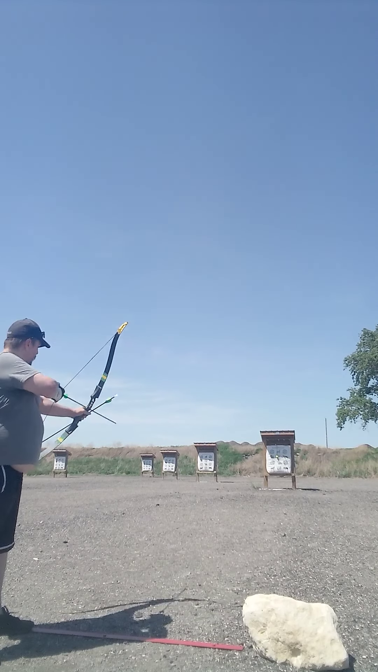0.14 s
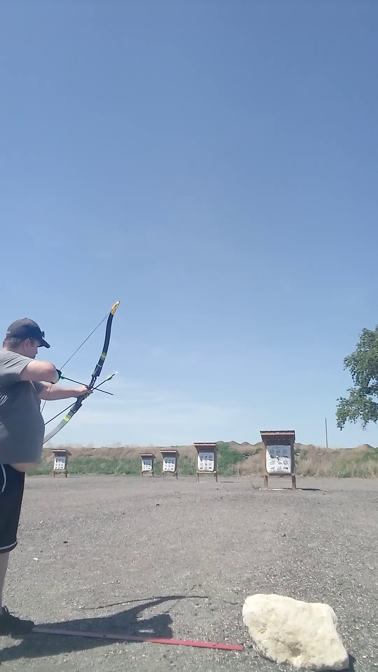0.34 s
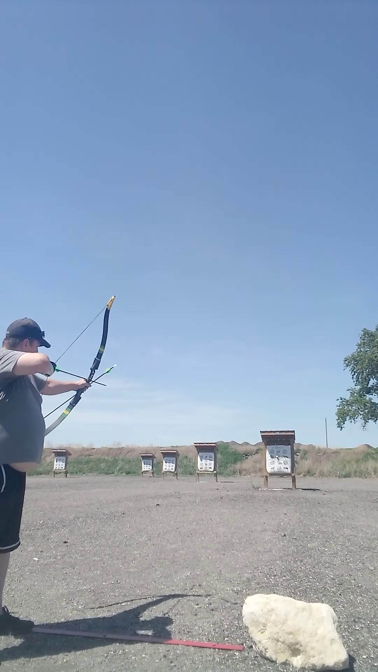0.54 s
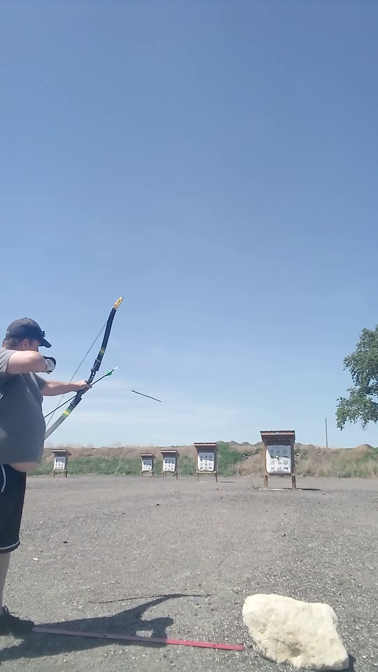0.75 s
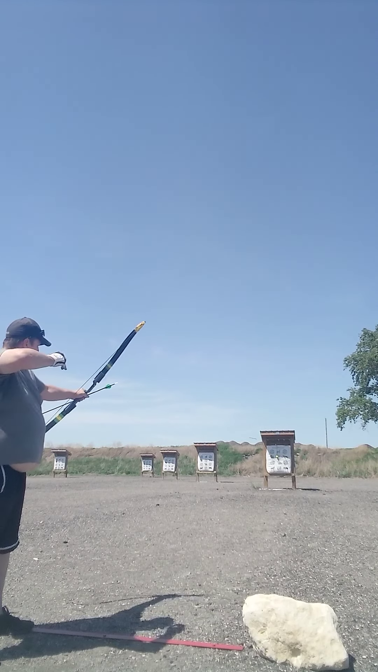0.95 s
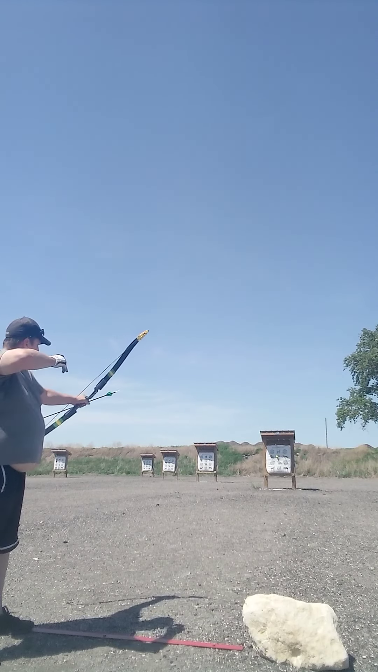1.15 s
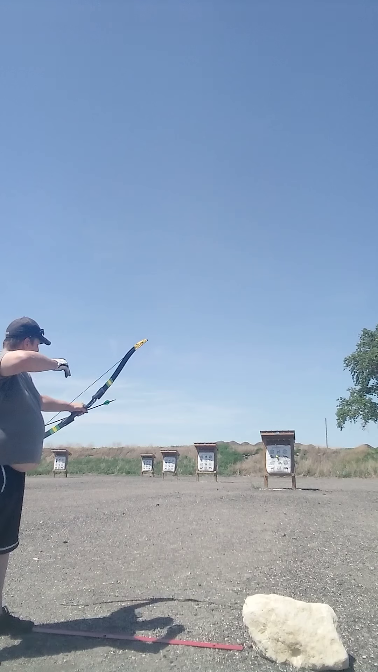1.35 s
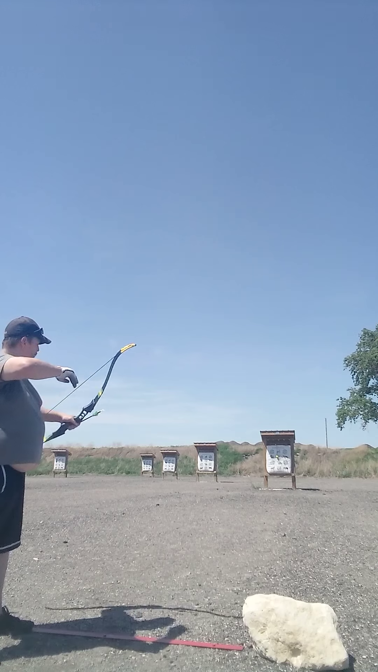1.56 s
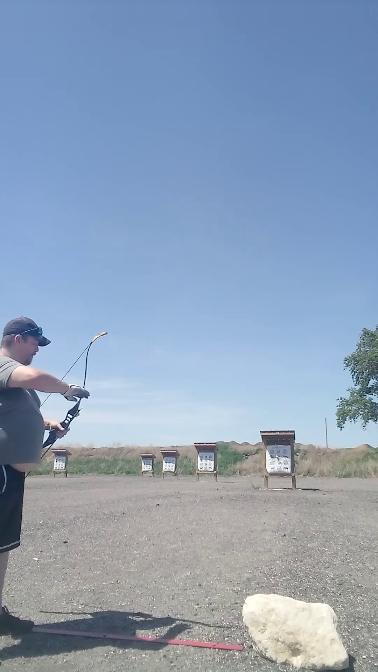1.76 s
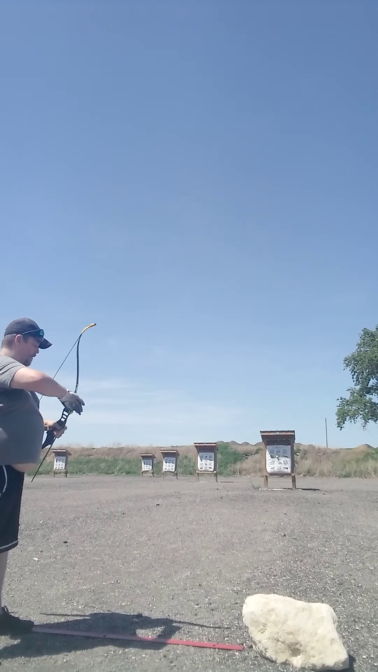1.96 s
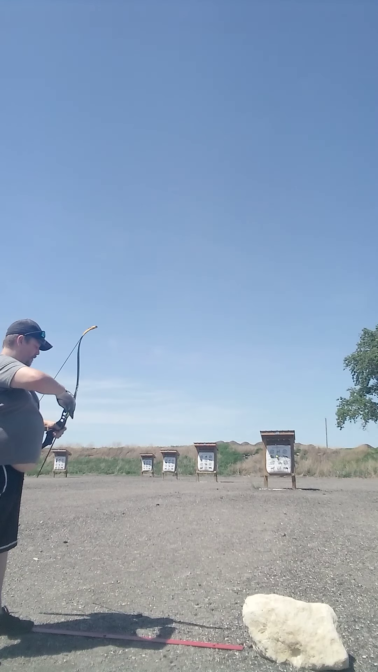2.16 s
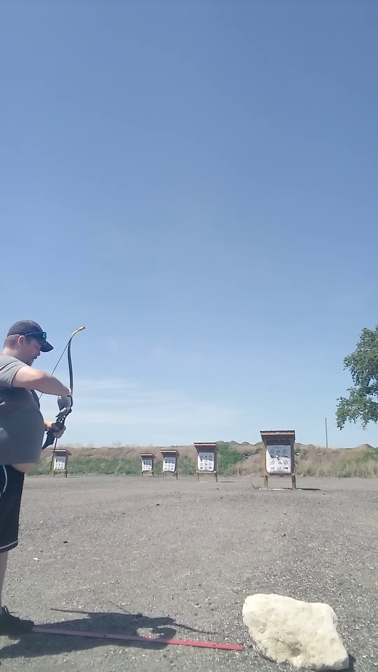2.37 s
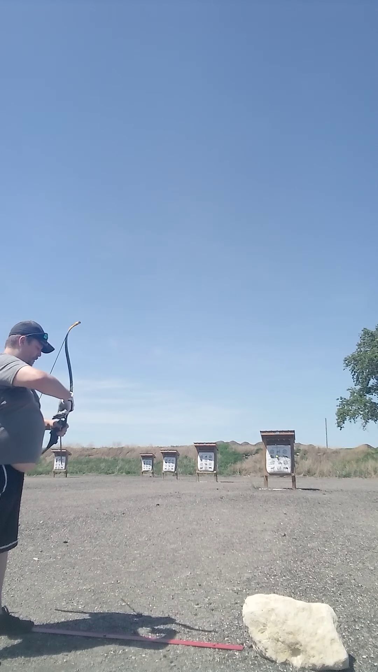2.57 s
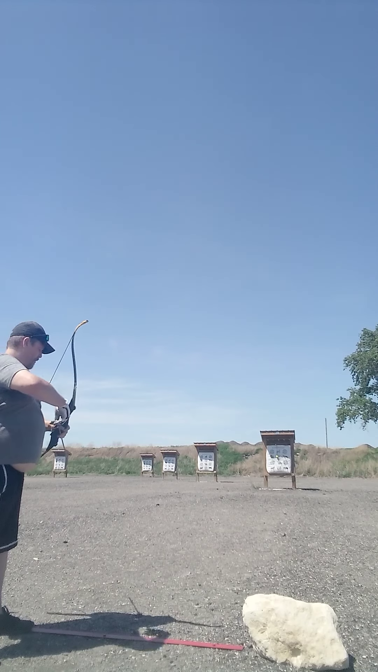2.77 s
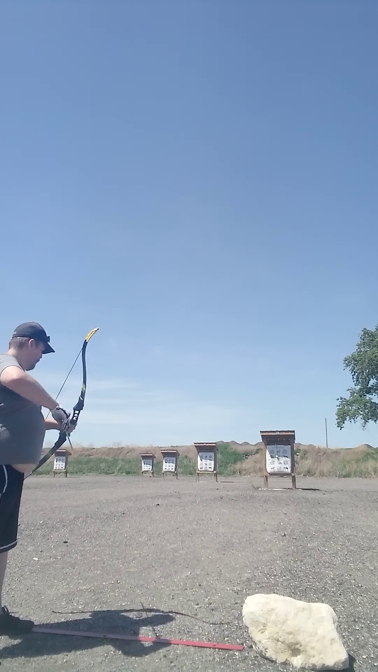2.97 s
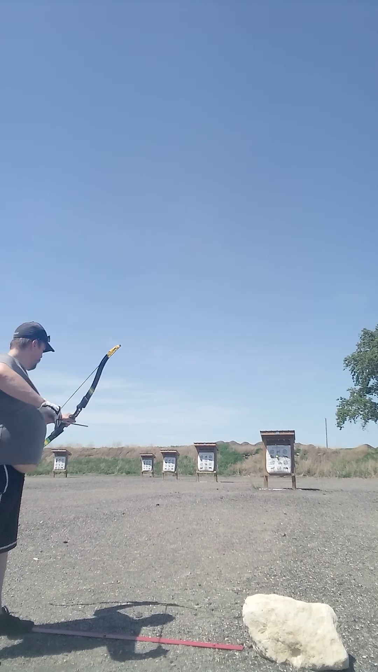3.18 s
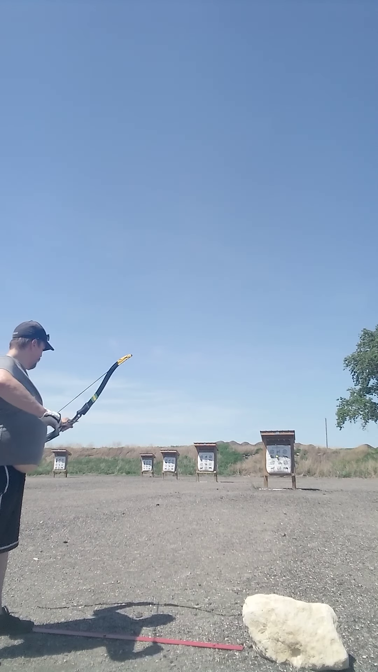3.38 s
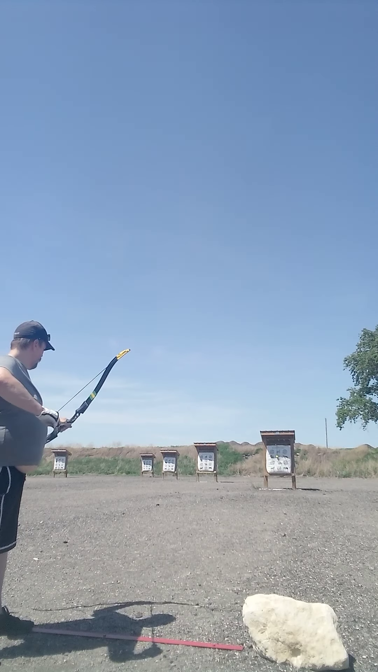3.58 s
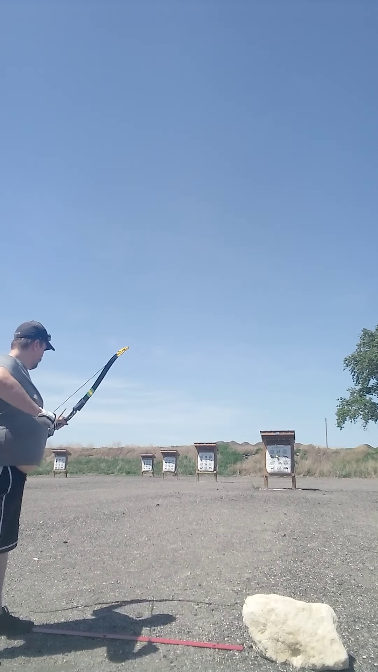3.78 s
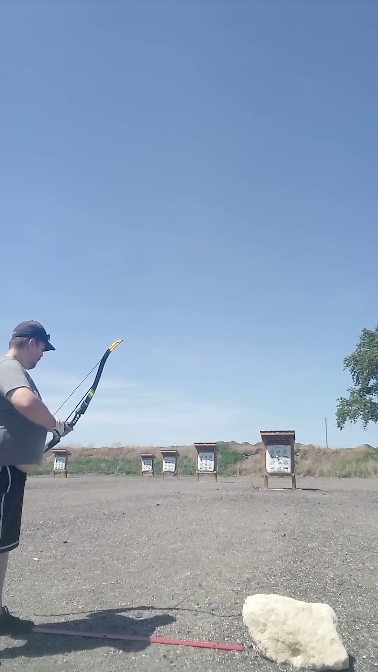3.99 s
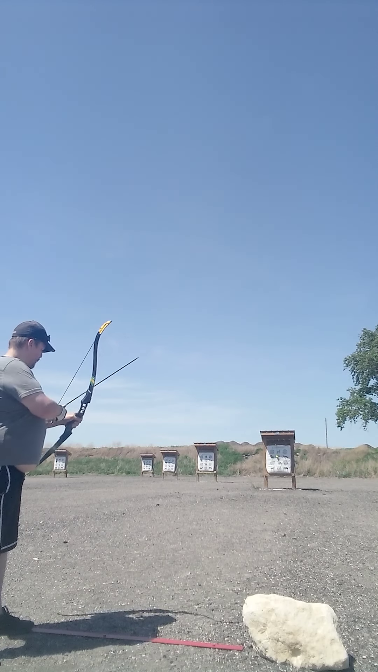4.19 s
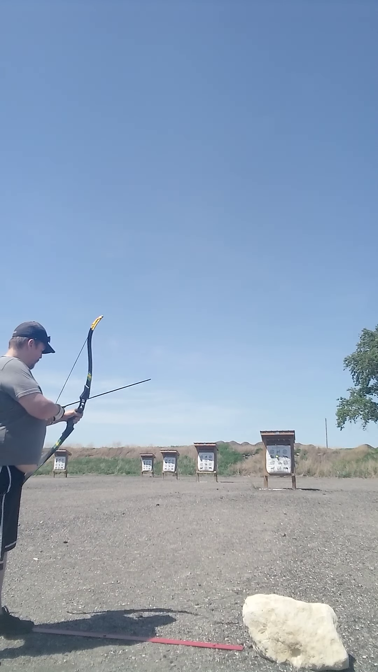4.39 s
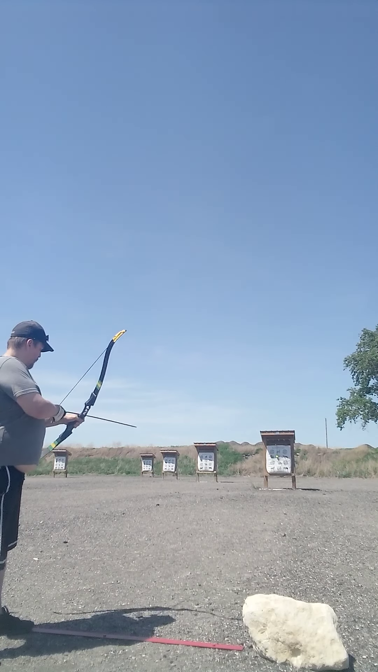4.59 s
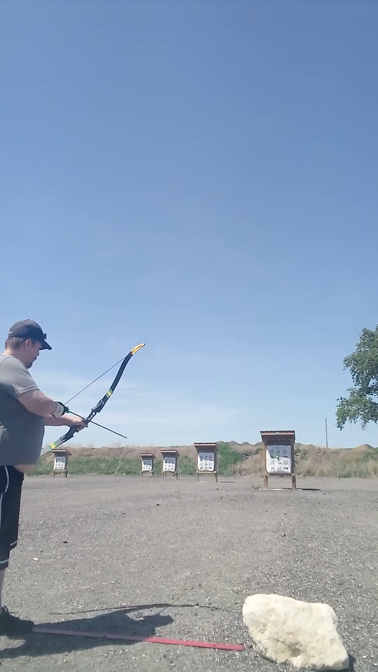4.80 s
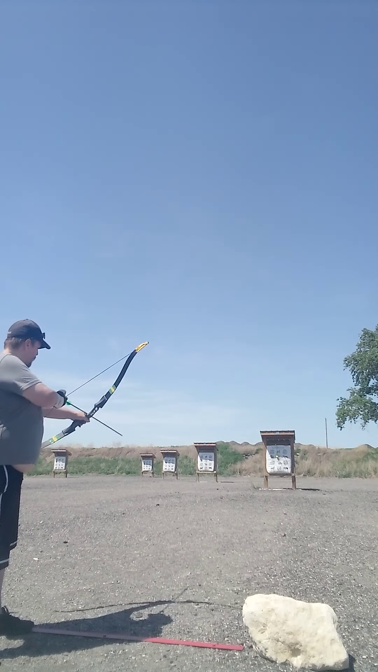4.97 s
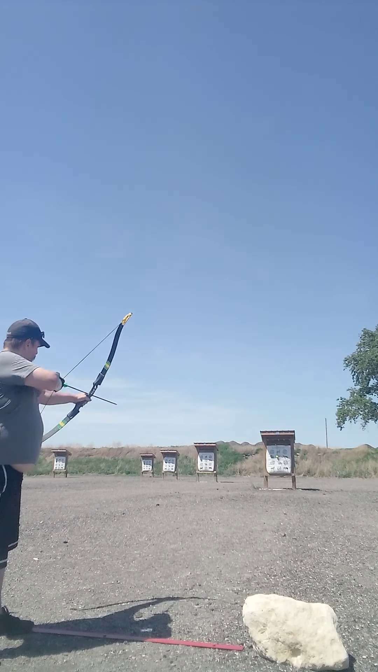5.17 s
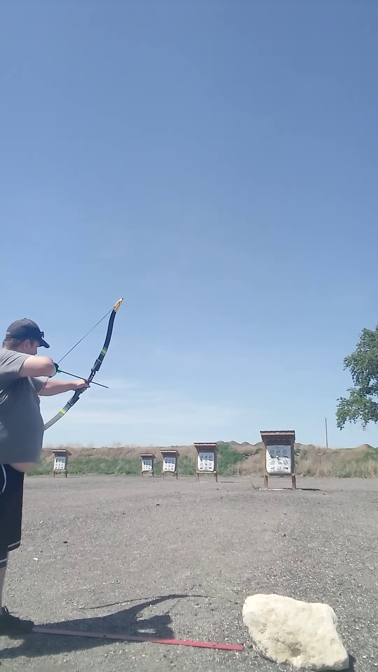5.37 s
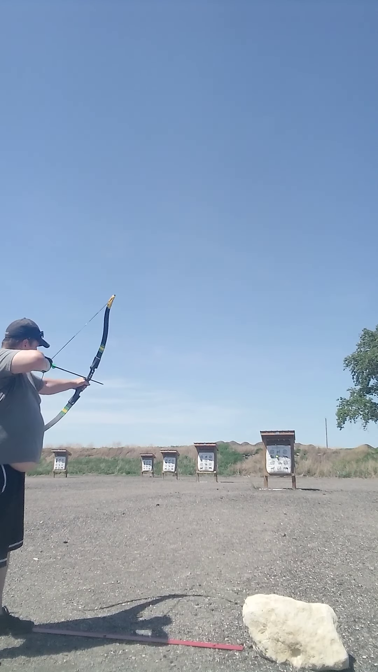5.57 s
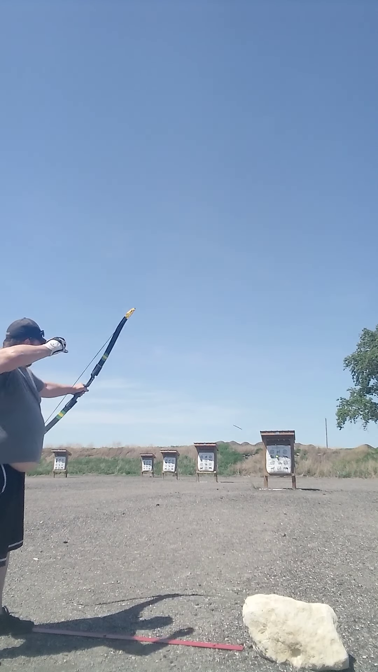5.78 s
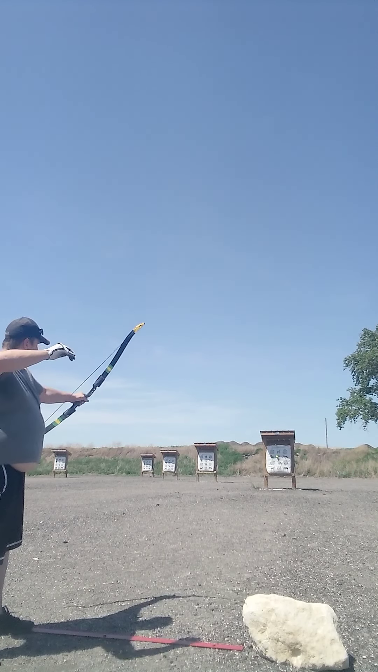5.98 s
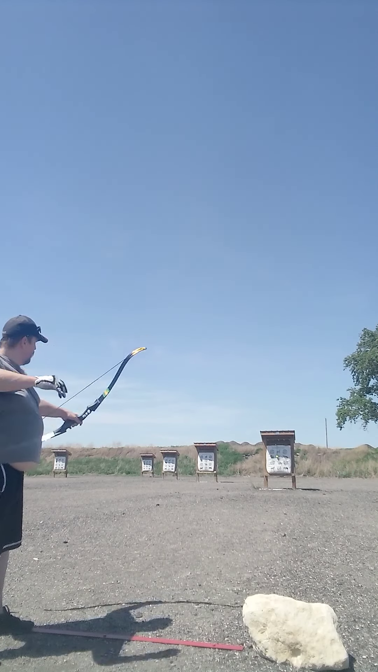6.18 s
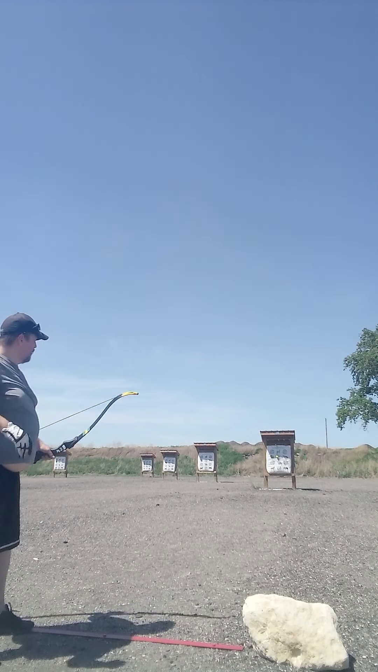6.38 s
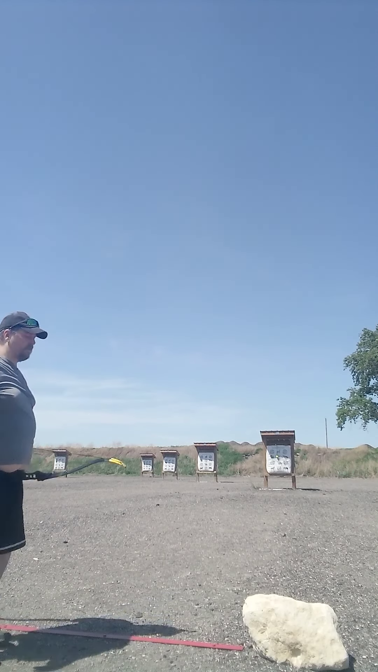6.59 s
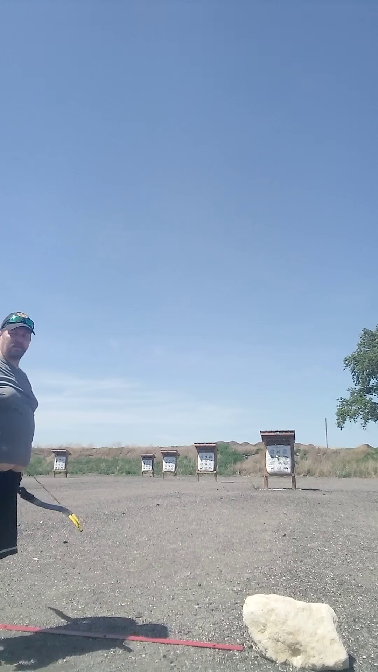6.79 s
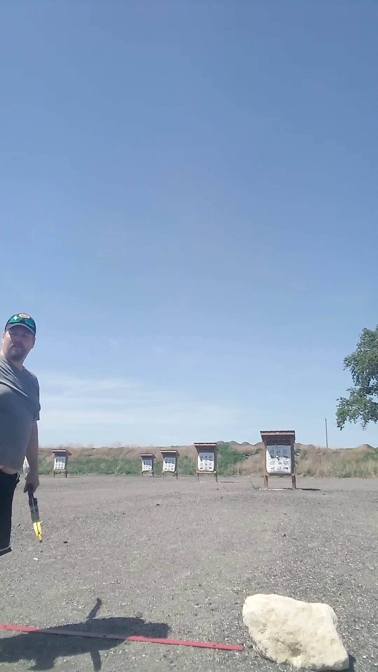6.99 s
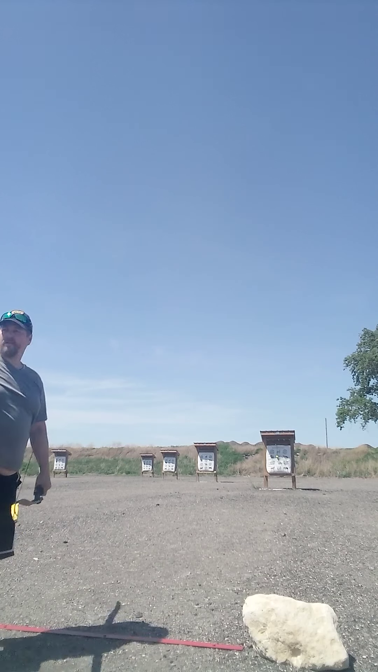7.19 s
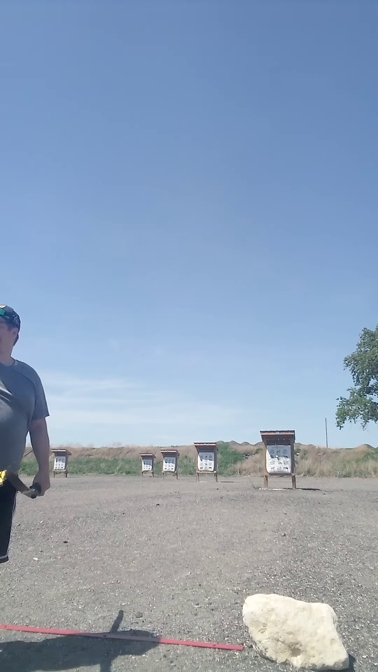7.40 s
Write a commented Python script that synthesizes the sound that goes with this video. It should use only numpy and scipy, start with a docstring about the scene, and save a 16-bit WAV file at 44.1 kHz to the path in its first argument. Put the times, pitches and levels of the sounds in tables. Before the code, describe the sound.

Wind rumbles and flutters on the microphone throughout, strongest in the first half second, over a faint drone of distant traffic and a soft hiss of leaves. At about 0.85 seconds a recurve bow is shot a few metres away: the arrow rattles across the rest and the string slaps, leaving a brief low hum. Around 3.4 seconds the next arrow is nocked with a few hard, bright clicks. From 4.6 to 5.4 seconds it ticks lightly against the rest with a small ring. A small bird chips faintly several times between 4.4 and 6.4 seconds. The second shot snaps and twangs at about 5.75 seconds. A hand knocks sharply on the bow at 6.25 seconds, and shoes grind quietly on gravel from 6.7 to 7 seconds. The wind swells again at the end. The open space gives very little echo.

```python
"""A gravel archery range: an archer shoots two arrows from a recurve bow, a few metres from a phone.
At each release the arrow rattles on the rest and two string slaps set string and limbs humming.
Between shots an arrow clicks and ticks as it is nocked; later a hand knocks the bow and shoes turn.
Wind buffets the microphone; a far road drones, leaves hiss and a small bird chips."""
import sys
import numpy as np
from scipy import signal
from scipy.fft import rfft, irfft, next_fast_len
from scipy.io import wavfile
from scipy.ndimage import uniform_filter1d

SR = 44100
rng = np.random.default_rng(int(sys.argv[2]) if len(sys.argv) > 2 else 0)


def digitize_waveform(pressure):
    """Quantize a signal to 16-bit integers and store it at the path in sys.argv[1].

    Rows of a 2-D input are taken as channels; values are limited to [-1, 1].
    """
    field = np.atleast_2d(pressure).T
    bounded = np.clip(field, -1, 1)
    quanta = np.round(bounded * 32767).astype(np.int16)
    wavfile.write(sys.argv[1], SR, quanta)


N = 328382
T = np.arange(N) / SR
AGE = T[:SR // 2]  # seconds since a blow

# Wind strength. Each row: time in seconds, level in dB.
WIND_LEVEL = [(0.0, -48.5), (0.54, -53), (0.74, -53.5), (1.1, -59.5), (2.67, -55.5), (2.92, -59.5),
              (3.17, -62), (3.54, -63.5), (3.69, -75), (3.92, -69), (4.13, -60), (4.4, -59.5),
              (5.16, -58.5), (5.41, -68), (5.99, -52.5), (6.8, -65), (7.15, -63.5), (7.45, -52)]


def undb(db):
    """Decibels to gain."""
    return 10 ** (np.asarray(db) / 20)


def unit(x):
    """Scale to rms 1."""
    return x / np.sqrt(np.mean(x ** 2) + 1e-30)


def add(out, start_s, x):
    """Mix x into out from start_s on."""
    i = max(int(start_s * SR), 0)
    out[i:i + len(x)] += x[:max(N - i, 0)]


def colour(x, tone, tilt_db_oct=0):
    """Minimum-phase filter of unit power through tilted (Hz, dB) points."""
    size = next_fast_len(len(x)) * 2
    octave = np.log2(np.maximum(np.fft.rfftfreq(size, 1 / SR), 1))
    hz, db = np.transpose(tone)
    gain = unit(undb(np.interp(octave, np.log2(hz), db + tilt_db_oct * np.log2(hz))))
    cepstrum = irfft(np.log(gain))
    cepstrum[1:size // 2] *= 2
    cepstrum[size // 2 + 1:] = 0
    return irfft(rfft(x, size) * np.exp(rfft(cepstrum)))[:len(x)]


def cut(x, order, hz, kind="low"):
    """Butterworth low-pass or high-pass."""
    return signal.sosfilt(signal.butter(order, hz, kind, fs=SR, output="sos"), x)


def resonate(x, modes):
    """Parallel resonances (Hz, width Hz, dB) of unit total power."""
    ring = sum(undb(db) * width_hz * np.exp(-np.pi * width_hz * AGE) * np.cos(2 * np.pi * hz * AGE)
               for hz, width_hz, db in modes)
    ring = cut(ring, 2, 1500, "high")  # small parts radiate no bass
    return signal.fftconvolve(x, ring / np.linalg.norm(ring))[:len(x)]


def fade(t60_s):
    """Envelope that falls 60 dB in t60_s."""
    return np.exp(-np.log(1000) * AGE / t60_s)


def burst(decay_ms, rise_ms=0.071):
    """Rough contact: fast-decaying noise."""
    age_ms = AGE * 1000
    return rng.standard_normal(len(AGE)) * np.exp(-age_ms / decay_ms) * (1 - np.exp(-age_ms / rise_ms))


def walk(rate_hz):
    """Smooth random drift, spread near 1."""
    hop = int(SR / rate_hz)
    knots = rng.standard_normal(N // hop + 2)
    return np.sqrt(2) * uniform_filter1d(np.interp(np.arange(N) / hop, np.arange(len(knots)), knots), hop)


def curve(points, times_s=T):
    """Straight lines through (s, value) points."""
    return np.interp(times_s, *np.transpose(points))


def noise(tone, patchy_db=0, size=1024):
    """Coloured noise of rms 1; narrow bands flicker separately by patchy_db."""
    bands = signal.stft(colour(rng.standard_normal(N), tone), nperseg=size)[2]
    flicker = uniform_filter1d(rng.standard_normal(bands.shape), size=3, axis=0)
    flicker = unit(uniform_filter1d(flicker, size=5, axis=1))
    return unit(signal.istft(bands * undb(patchy_db * flicker), nperseg=size)[1][:N])


def shimmer(level_db=-88.5, flicker_db=5):
    """A thin, faint, flickering band of hiss near 7 kHz."""
    # Each row: frequency in Hz, level in dB.
    spectrum = [(6500, -39.5), (7000, -1), (7150, -0.5), (7300, -8), (7700, -32.5)]
    return noise(spectrum) * undb(level_db + flicker_db * walk(17))


def leaves(gain_db=1.9):
    """Leaves hiss in the breeze."""
    # Each row: frequency in Hz, level in dB.
    spectrum = [(1500, -4), (2500, -2), (3400, 3.5), (6200, 6.5), (6700, -6.5), (7400, -5.5), (8400, -25),
                (13500, -27.5), (15200, -15.5)]
    # Each row: time in seconds, level in dB.
    levels = [(0.0, -78), (1.47, -76.5), (2.53, -81), (3.63, -75.5), (3.77, -79), (4.64, -75.5),
              (4.81, -73), (6.51, -75.5), (7.13, -78), (7.45, -84)]
    return noise(spectrum, patchy_db=5) * undb(curve(levels) + gain_db + walk(15))


def road(gain_db=-0.16, flutter_db=0.5):
    """Far traffic drones, swelling and fading."""
    # Each row: frequency in Hz, level in dB.
    spectrum = [(300, -30), (480, -21.5), (570, -14), (690, -0.5), (800, -2), (1000, 0.5), (1260, -3.5),
                (1600, -8.5), (2000, -14.5), (2600, -21.5), (4000, -60)]
    # Each row: time in seconds, level in dB.
    levels = [(0.0, -61.5), (0.62, -64), (0.79, -64), (1.04, -59.5), (1.24, -60.5), (1.66, -60),
              (1.95, -66), (2.28, -70), (3.07, -64.5), (3.19, -66), (4.23, -69), (4.73, -66), (4.94, -62.5),
              (5.58, -62.5), (6.49, -67.5), (6.64, -66.5), (6.93, -61), (7.45, -67)]
    return noise(spectrum, patchy_db=3) * undb(curve(levels) + gain_db + flutter_db * walk(12))


def tyres(sway=0.005, smear_hz=42):
    """Far tyres sing; many paths through moving air smear each tone into a narrow band."""
    # Each row: start and end in seconds, start and end pitch in Hz, level in dB.
    passes = [(.55, 1.65, 985, 940, -60.5), (.95, 1.9, 715, 700, -67.5), (.1, 3.5, 1635, 1645, -76),
              (1.6, 4.6, 692, 675, -68.5), (4.5, 5.4, 640, 650, -70)]
    out = np.zeros(N)
    for start_s, end_s, start_hz, end_hz, db in passes:
        progress = np.clip((T - start_s) / (end_s - start_s), 0, 1)
        hz = (start_hz + (end_hz - start_hz) * progress) * (1 + sway * walk(5))
        phase = 2 * np.pi * np.cumsum(hz) / SR
        tone = walk(smear_hz) * np.sin(phase) + walk(smear_hz) * np.cos(phase)
        out += undb(db) * np.sin(np.pi * progress) * tone / np.sqrt(2)
    return out


def bird(roughness=0.03, arch_hz=260):
    """Short arched, gliding whistles of unsteady pitch."""
    # Each row: start and length in seconds, middle pitch in Hz, glide in Hz, level in dB.
    chips = [(4.358, 0.029, 3820, 1216.5, -60.5), (5.107, 0.061, 3670, -250, -64.5),
             (5.228, 0.067, 3610, -400, -63), (5.359, 0.053, 3640, 100.5, -61.5),
             (5.621, .027, 3670, 1801, -54.5), (6.388, .055, 3260, -350, -67)]
    out = np.zeros(N)
    for start_s, length_s, middle_hz, glide_hz, db in chips:
        progress = np.linspace(0, 1, int(length_s * SR))
        hz = middle_hz + glide_hz * (progress - .5) - arch_hz * (2 * progress - 1) ** 2
        hz *= 1 + roughness * walk(700)[:len(progress)]
        add(out, start_s, undb(db) * np.sin(np.pi * progress) * np.sin(2 * np.pi * np.cumsum(hz) / SR))
    return out


def wind(gain_db=3.4, flutter_db=2.4):
    """Wind on the microphone: a fluttering rumble."""
    # Each row: frequency in Hz, level in dB.
    spectrum = [(20, -35.5), (35, -19), (51, -6.5), (80, 0.5), (135, -4), (180, -11), (265, -34),
                (450, -43), (2000, -100)]
    return noise(spectrum) * undb(curve(WIND_LEVEL) + gain_db + flutter_db * walk(22))


def small_eddies(count=36, offset_db=10, spread_db=2, swings=0.48):
    """Rows (s, dB, swings) of weak eddies at random times; their level rides on the wind."""
    times_s = (np.arange(count) + rng.random(count)) * T[-1] / count
    levels_db = curve(WIND_LEVEL, times_s) + offset_db + spread_db * rng.standard_normal(count)
    return [(peak_s, db, swings) for peak_s, db in zip(times_s, levels_db)]


def eddies(gain_db=-1.5, swirl_db=-13, strong_db=-32, strong_hz=124, db_per_octave=34, wake_swings=1):
    """Each eddy swings the pressure; stronger ones swing faster and shed more fine swirls."""
    # Strongest eddies. Each row: peak time in seconds, level in dB, half-length in swings.
    strongest = [(0.03, -31.5, 0.26), (0.083, -27.5, 0.68), (0.133, -28.5, 1.55), (0.262, -34, 0.25),
                 (0.348, -30.5, 0.55), (.395, -31.5, 0.45), (.439, -30.5, 0.59), (0.801, -35, 0.86),
                 (1.139, -35, 0.82), (1.322, -33, 0.59), (1.413, -32.5, 0.35), (1.91, -34, 0.76),
                 (2.444, -34, 1.9), (2.695, -38.5, 0.55), (2.73, -34, 0.34), (3.283, -36.5, 0.39),
                 (5.89, -33, 0.45), (7.407, -30, 1.16)]
    swirls = noise([(70, -3.5), (150, 5), (240, 3), (310, -6.5), (400, -22.5), (550, -27.5),
                    (900, -48.5), (4000, -100)])
    out = np.zeros(N)
    for peak_s, db, swings in strongest + small_eddies():
        near = slice(max(int(peak_s * SR) - SR // 4, 0), int(peak_s * SR) + SR // 4)
        excess_db = db - strong_db
        hz = strong_hz * 2 ** (excess_db / db_per_octave) * np.exp(0.12 * rng.standard_normal())
        cycles = (T[near] - peak_s) * hz
        swell, trail = (np.exp(1 - np.hypot(1, cycles / span * np.sqrt(2)))
                        for span in (swings, swings + wake_swings))
        pressure = swell * np.sin(2 * np.pi * (cycles + rng.random()))
        wake = trail * undb(swirl_db + 0.86 * excess_db) * swirls[near]
        out[near] += undb(db + gain_db) * (pressure + wake)
    return out


def scatter(x, near_db=-17, near_t60_s=0.078, far_db=-27, far_t60_s=0.54):
    """Gravel and nearby structures return a faint short tail and a fainter, duller long one."""
    spectrum = [(150, -7.5), (450, -5.5), (1000, 1), (6500, -1), (8500, -13.5), (15000, -16.5)]
    out = x
    for db, t60_s, tilt_db_oct in ((near_db, near_t60_s, 0), (far_db, far_t60_s, -1)):
        tail = rng.standard_normal(len(AGE)) * fade(t60_s) * (AGE > .003)
        tail = colour(tail, spectrum, tilt_db_oct)
        out = out + undb(db) * signal.fftconvolve(x, tail / np.linalg.norm(tail))[:N]
    return out


def steps(grain_db=4):
    """Stones grind under a turning shoe in uneven grains."""
    # Each row: start in seconds, level in dB, decay in ms.
    turns = [(6.701, -58.5, 45), (6.76, -59, 43), (7.02, -56.5, 31)]
    # Each row: frequency in Hz, level in dB.
    gravel_spectrum = [(200, -12), (900, 10), (2500, -7), (6000, -13), (8500, -40), (15000, -46)]
    out = np.zeros(N)
    for start_s, db, decay_ms in turns:
        grains = unit(undb(grain_db * walk(400)))[:len(AGE)]
        add(out, start_s, undb(db) * colour(burst(decay_ms) * grains, gravel_spectrum))
    return out


def shaft_contact(force, tilt_db_oct):
    """The bright, direct sound of a contact on the arrow."""
    # Each row: frequency in Hz, level in dB.
    spectrum = [(450, -51), (1000, -21.5), (1900, -24.5), (2800, -12), (4400, -1.5), (7500, -3.5),
                (9000, -13.5), (11000, -18), (13500, -21), (15300, -13)]
    return colour(force, spectrum, tilt_db_oct)


def slides(catch_db=4):
    """The shaft catches and slips, rubbing in short squeaks."""
    # Each row: start and length in seconds, level in dB, tilt in dB per octave.
    pulls = [(0.13, 0.049, -68.5, 5.5), (2.971, 0.089, -67, -4.5), (6.521, 0.02, -63.5, -3.5)]
    out = np.zeros(N)
    for start_s, length_s, db, tilt_db_oct in pulls:
        stroke = np.sin(np.pi * np.minimum(AGE / length_s, 1))
        friction = unit(rng.standard_normal(len(AGE)) * undb(catch_db * walk(300))[:len(AGE)])
        add(out, start_s, undb(db) * shaft_contact(friction * stroke, tilt_db_oct))
    return out


def ticks(tick_db=-3, rest_db=-2, rest_top_hz=8000, ring_db=-5, ring_t60_s=0.05):
    """The arrow, seated and drawn, rings the rest at a pitch set by where it touches."""
    # Each row: start in seconds, level in dB, decay in ms, ring pitch in Hz.
    touches = [(4.6087, -38, 2.2, 3150), (4.6895, -44, 4.9, 3210), (4.7726, -46.5, 2.6, 2630),
               (4.8638, -56.5, 2.8, 3970), (4.9853, -50.5, 6.5, 2750), (5.079, -44, 4.2, 4200),
               (5.168, -46.5, 5.1, 2690), (5.256, -54, 4.2, 3210), (5.406, -51, 2.5, 3160)]
    # Each row: frequency in Hz, level in dB.
    spectrum = [(1200, -58), (2000, 0), (2500, 5), (4200, 5.5), (5200, 1), (7200, -1), (8500, -24),
                (11500, -20), (15000, -34.5)]
    # Each row: frequency in Hz, width in Hz, level in dB.
    rest_modes = [(2545, 29, 2), (3150, 63, -4), (3680, 130, 0), (4370, 170, -1), (5200, 130, -11),
                  (6200, 120, -14), (7100, 280, -9.5)]
    out = np.zeros(N)
    for start_s, db, decay_ms, ring_hz in touches:
        contact = burst(decay_ms, rise_ms=0.13)
        detune = 1 + 0.055 * rng.standard_normal()
        rest = resonate(contact, np.array(rest_modes) * (detune, 1, 1))
        rest = undb(rest_db) * cut(rest, 2, rest_top_hz)
        tick = undb(tick_db) * colour(contact, spectrum)
        ring = undb(ring_db) * np.sin(2 * np.pi * ring_hz * AGE) * fade(ring_t60_s)
        add(out, start_s, undb(db) * (tick + rest + ring))
    return out


def clicks(crack_db=-1, max_top_hz=19000):
    """Hard clicks on nock, rest and riser ring the shaft."""
    # Each row: start in seconds, level in dB, decay in ms, tilt in dB per octave.
    hits = [(3.004, -62, 4.4, -2.5), (3.3711, -25.5, 2.14, 3.5), (3.3795, -35, 1.3, -3),
            (3.4582, -34.5, 2, -2.5), (3.484, -46.5, 1.9, -6), (3.671, -52.5, 3.2, -5),
            (3.7298, -52, 4.1, -5), (5.8715, -65, 2, 17)]
    # Each row: frequency in Hz, width in Hz, level in dB.
    shaft_modes = [(2890, 89, 1), (4040, 370, -5.5), (5110, 110, 2.5), (5040, 122, -6), (6100, 190, 3.5),
                   (7640, 240, -13), (10960, 730, -13.5), (15400, 380, -7)]
    out = np.zeros(N)
    for start_s, db, decay_ms, tilt_db_oct in hits:
        contact = burst(decay_ms)
        crack = undb(crack_db) * shaft_contact(contact, tilt_db_oct)
        shaft = resonate(contact, [(hz, width_hz, mode_db + tilt_db_oct * np.log2(hz))
                                   for hz, width_hz, mode_db in shaft_modes])
        top_hz = max_top_hz * 2 ** (min(tilt_db_oct, 0) / 4)  # duller clicks also lose their top
        add(out, start_s, undb(db) * cut(crack + shaft, 4, top_hz))
    return out


def knock(snap_db=2, snap_delay_ms=1.01, crack_db=-13, crack_ms=2, body_db=-23, body_ms=8):
    """A hand comes down on the bow: one swing of air, a snap as the contact closes, a damped body."""
    # Each row: start in seconds, level in dB, push length in ms.
    blows = [(6.2489, -17, 1.125)]
    # Each row: frequency in Hz, level in dB.
    snap_spectrum = [(200, -1.5), (1100, 4), (1850, -1), (2200, -2), (2750, -5), (4000, 0.5), (4600, -2.5),
                     (5600, -1.5), (7000, -14.5), (8500, -25), (11500, -16), (15000, -28)]
    body_spectrum = [(70, -45), (170, 13), (500, -1), (1200, -14), (4000, -45), (9000, -52)]
    out = np.zeros(N)
    for start_s, db, push_ms in blows:
        cycles = AGE * 1000 / push_ms
        push = -0.76 * np.sin(2 * np.pi * cycles) * (cycles < 1)
        contact = undb(crack_db) * burst(crack_ms) - undb(snap_db) * (AGE == 0)
        body = undb(body_db) * colour(burst(body_ms), body_spectrum)
        add(out, start_s, undb(db) * (push + body))
        add(out, start_s + snap_delay_ms / 1000, undb(db) * colour(contact, snap_spectrum))
    return out


def scrape(decay_ms, scrape_db=-2, riser_db=-3):
    """A brief rough contact rings the riser."""
    # Each row: frequency in Hz, level in dB.
    spectrum = [(710, 1.5), (1200, 0.5), (1850, -0.5), (2730, 5), (3700, -5.5), (5130, -5), (6440, 4.5),
                (7820, -19), (8350, -27), (9930, -22), (16000, -11)]
    # Each row: frequency in Hz, width in Hz, level in dB.
    riser_modes = [(2456, 240, 1), (2850, 86, 2.5), (3260, 210, 4.5), (3930, 520, -8.5), (4500, 150, 0.5),
                   (5200, 220, -2), (6490, 200, 1.5)]
    contact = burst(decay_ms, rise_ms=0.22)
    return undb(scrape_db) * colour(contact, spectrum) + undb(riser_db) * resonate(contact, riser_modes)


def twang(flex=0.0284):
    """String and limbs ring; the flexing limbs vary the tension, so the pitch wanders."""
    # Each row: frequency in Hz, level in dB, t60 in seconds.
    bow_modes = [(118, -64, 0.51), (227, -38.5, 0.38), (339, -44.5, 0.42), (433.5, -55, 0.56),
                 (508.3, -33.5, 0.22), (548, -35.5, 0.17), (635, -40, 0.18), (765, -34, 0.087),
                 (829, -53, 0.49), (1066, -32.5, 0.05), (1284, -52.5, 0.17)]
    warped_s = np.cumsum(1 + flex * walk(70)[:len(AGE)]) / SR
    return sum(undb(db) * np.sin(2 * np.pi * hz * warped_s) * fade(t60_s) for hz, db, t60_s in bow_modes)


def slap(contact_ms, thud_db=-37, thud_ms=20):
    """The string thuds and drives the bow's modes; a long push reaches only the low ones."""
    thud_spectrum = [(70, -19), (180, 13), (380, 5.5), (600, -5), (1200, -6), (2000, -21.5), (4000, -45)]
    push = np.hanning(int(contact_ms * SR / 1000) + 3)
    thud = undb(thud_db) * colour(burst(thud_ms), thud_spectrum)
    return np.convolve(twang() + thud, push / push.sum())


def bow(whir_lead_s=0.0185, whir_s=0.0096, whir_hz=660, whir_db=-43.5,
        chatter_delay_s=0.03, chatter_gap_s=0.0087, chatter_fall_db=1.5):
    """The string whirs off the glove and slaps twice; the arrow rattles past; the rest chatters."""
    # Each row: first slap in seconds, arrow-on-riser delay in ms, its level in dB, its decay in ms,
    # chatter level in dB.
    shots = [(0.8503, 7.5, -31.5, 3, -48.5), (5.7542, 1.5, -23.5, 1.36, -63)]
    # The string snaps taut, then swings back. Each row: delay in ms, level in dB, contact in ms.
    slaps = [(0, -1, 1.71), (17, -3, 0.4)]
    # Glove slips, shaft scrapes the rest, vanes brush it, nock leaves.
    # Each row: offset from the first slap in ms, level in dB, decay in ms.
    rattle = [(-17.5, -44.5, 4.5), (-6.5, -37.5, 6.6), (8.5, -35.5, 2.4), (15.5, -26, 2.02)]
    out = np.zeros(N)
    whir = np.sin(np.pi * np.minimum(AGE / whir_s, 1)) * np.sin(2 * np.pi * whir_hz * AGE)
    for shot_s, strike_ms, strike_db, strike_decay_ms, chatter_db in shots:
        add(out, shot_s - whir_lead_s, undb(whir_db) * whir)
        for delay_ms, db, contact_ms in slaps:
            add(out, shot_s + delay_ms / 1000, undb(db) * slap(contact_ms))
        for offset_ms, db, decay_ms in rattle + [(strike_ms, strike_db, strike_decay_ms)]:
            add(out, shot_s + offset_ms / 1000, undb(db) * scrape(decay_ms))
        for bounce in range(4):
            chatter = undb(chatter_db - bounce * chatter_fall_db) * scrape(decay_ms=2.6)
            add(out, shot_s + chatter_delay_s + bounce * chatter_gap_s, chatter)
    return out


def scene():
    """Archer and bird with their reflections, over wind and far sounds; mono."""
    archer = bow() + clicks() + ticks() + slides() + knock() + steps()
    return (scatter(archer + bird()) + wind() + eddies() + road() + leaves() + tyres() + shimmer())[None]


def record(dry, bass_hz=35, top_hz=16000):
    """The phone drops the deepest bass and cuts the top."""
    thin = cut(dry, 2, bass_hz, "high")
    return signal.sosfilt(signal.ellip(8, .2, 70, top_hz, fs=SR, output="sos"), thin)


dry = scene()
out = record(dry)
digitize_waveform(out)
```